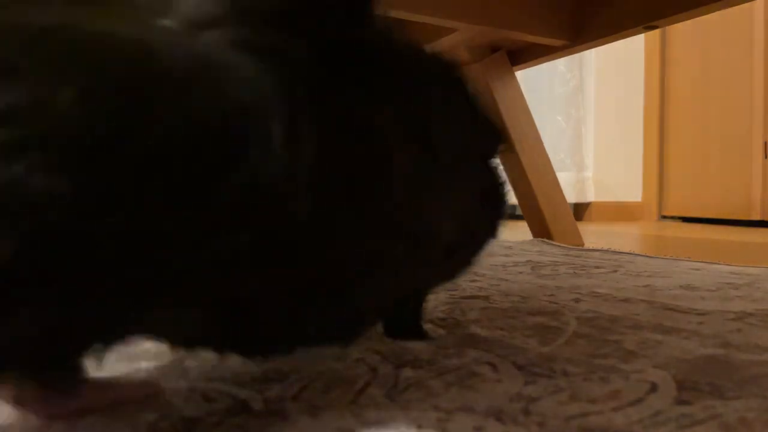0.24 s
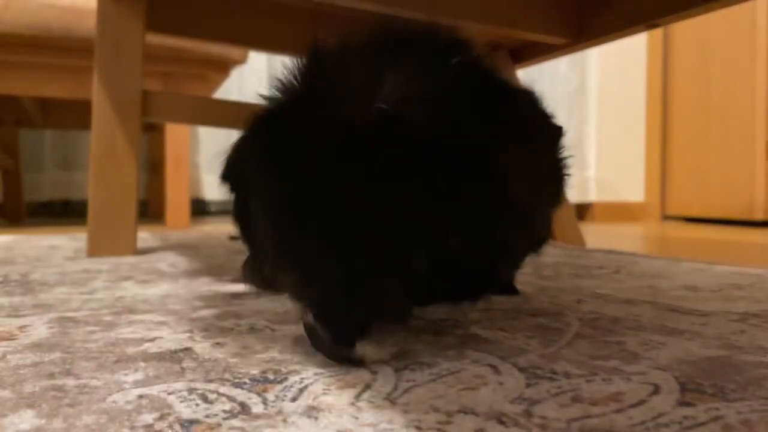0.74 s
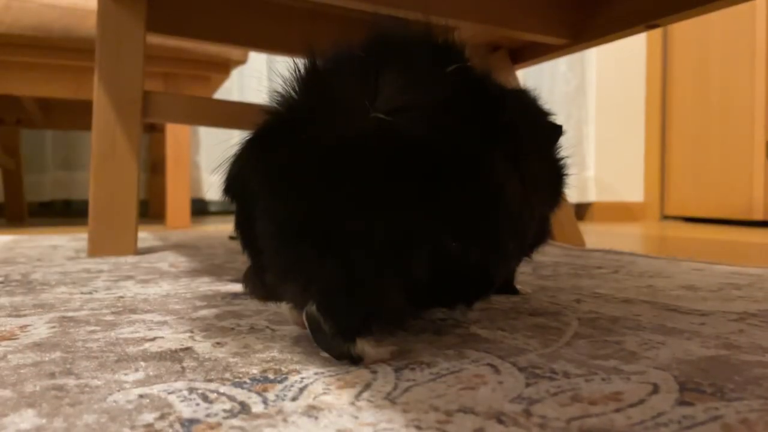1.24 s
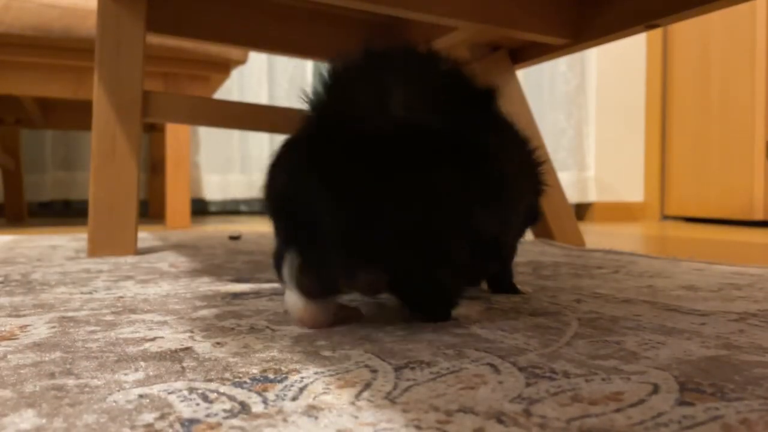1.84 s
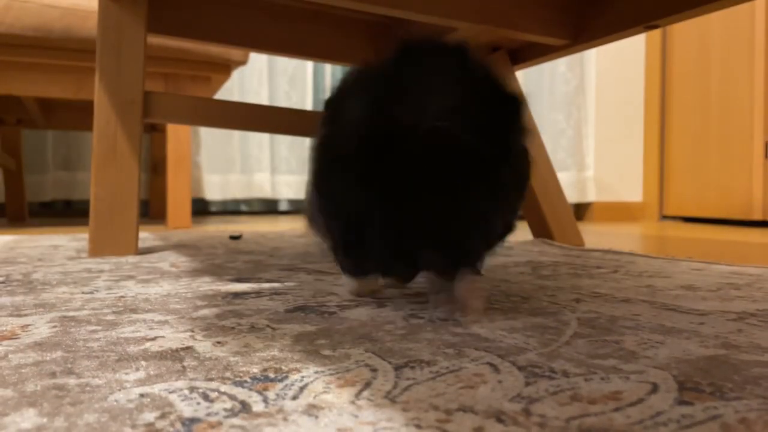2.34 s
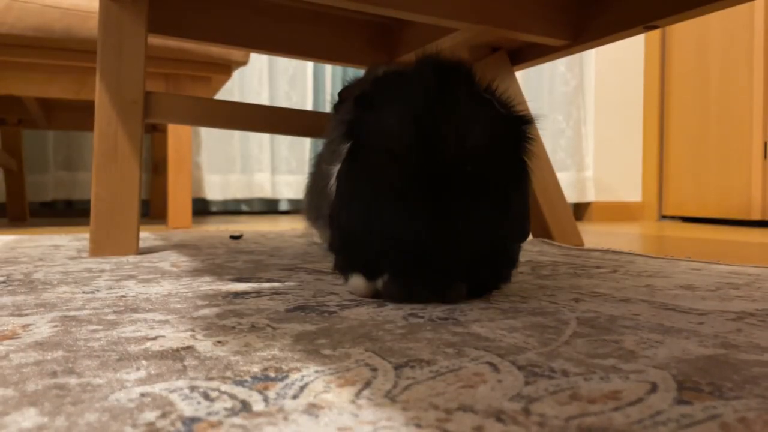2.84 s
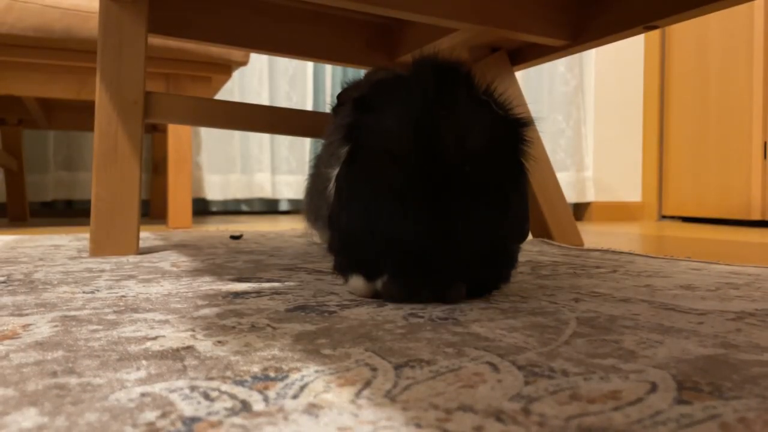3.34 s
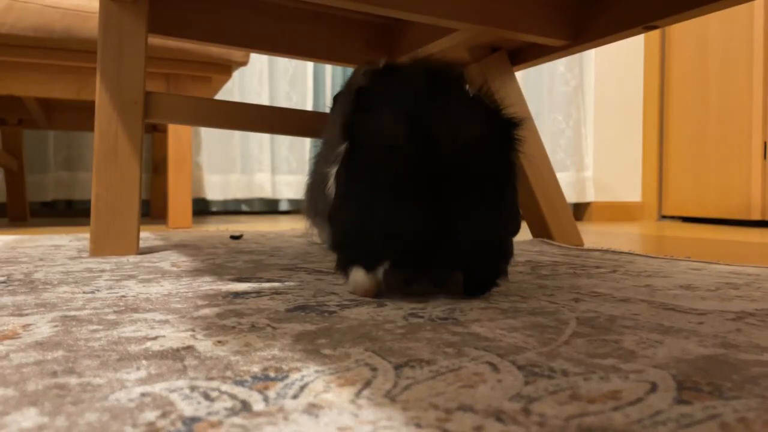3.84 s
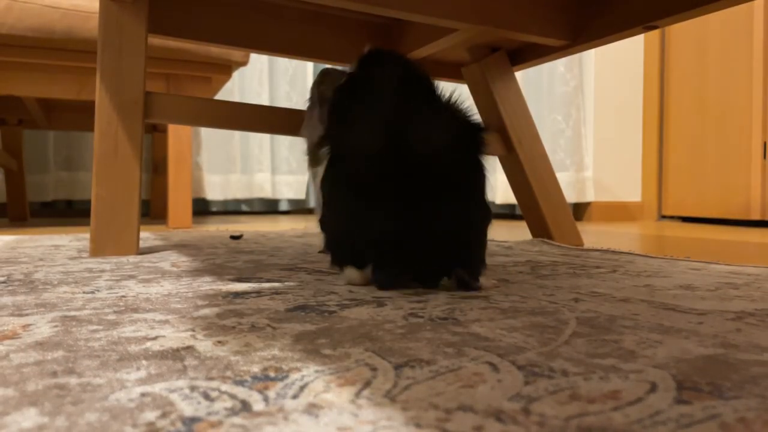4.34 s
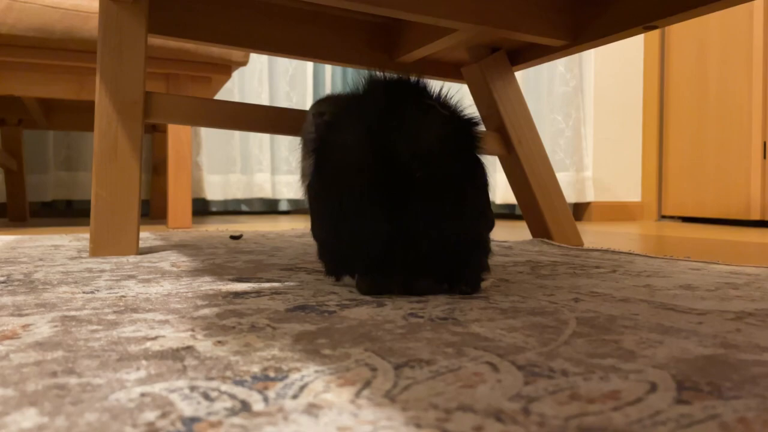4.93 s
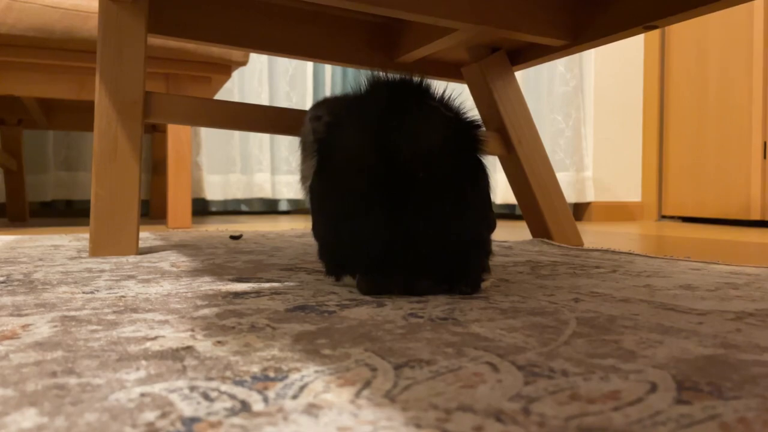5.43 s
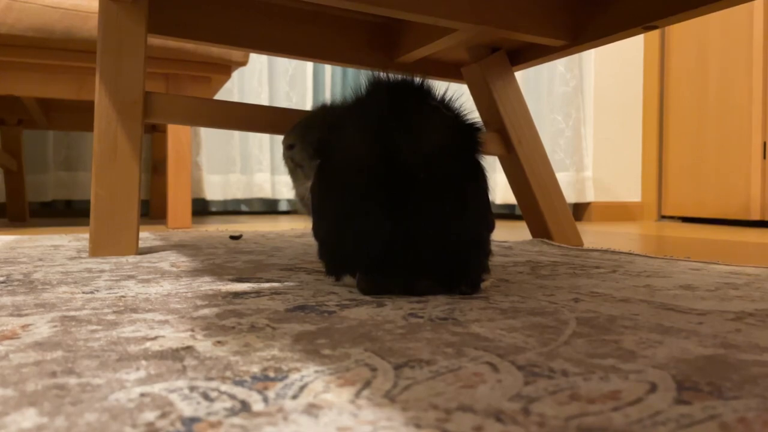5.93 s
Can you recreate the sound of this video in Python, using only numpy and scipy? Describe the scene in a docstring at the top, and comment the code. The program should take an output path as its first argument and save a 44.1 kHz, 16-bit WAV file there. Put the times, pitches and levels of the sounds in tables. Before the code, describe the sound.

Quiet, low-pitched guinea pig chutting, crackly pulses flipping into brief chirps, with faint rug scuffs and soft thumps over a low room rumble.

```python
"""Under a low wooden table in a quiet room, a guinea pig chuts as it walks away over a rug.
Its slack vocal folds creak in bouts of crisp pulses that quicken and flip into short arched chirps.
The voice turns duller as it faces away; claws, fur and a dull knock are swells of grainy noise.
Low thumps ring in the floor, the nose hisses softly, and the house rumbles steadily below."""
import sys
import numpy as np
from scipy import signal
from scipy.fft import rfft, irfft
from scipy.io import wavfile

SR = 44100
rng = np.random.default_rng(int(sys.argv[2]) if len(sys.argv) > 2 else 0)


def unload_audio(sound):
    """Save the sound as a 16-bit wav file, at the path given as the first command line argument."""
    columns = np.transpose(np.atleast_2d(sound))
    # keep every value between -1 and 1, then stretch to whole-number steps
    steps = np.round(np.clip(columns, -1, 1) * 32767)
    wavfile.write(sys.argv[1], SR, steps.astype(np.int16))


N = 272582  # samples in the scene

# Tonal chirps. Each row: start in seconds, length in seconds, top pitch in Hz,
# place of the top within the chirp from 0 to 1, relative level in dB.
CHIRP_CALLS = [(0.107, 0.026, 874, 0.75, -43), (0.142, 0.019, 404.4, 0.37, -39.5),
               (0.162, 0.026, 645, 0.28, -38), (0.181, 0.022, 774, 0.89, -43),
               (0.313, 0.02, 460, 0.3, -39.5), (.339, 0.015, 615, 0, -36), (0.384, 0.014, 1125, 1, -44),
               (0.456, 0.02527, 749, 0.65, -42), (0.543, 0.016, 390, 0.2, -40.5),
               (0.562, 0.022, 576, 0.4, -40.5), (.653, 0.025, 1063, 0.96, -44),
               (0.679, 0.017, 878, 0, -40.5), (0.748, 0.026, 950, 0.59, -42.5),
               (.954, 0.015, 780, 0.6, -42), (1.052, 0.02006, 814, 0.07, -43.5),
               (1.144, 0.02, 840, 0.38, -40.5), (1.245, .012, 770, 0.13, -45),
               (1.46, 0.017, 878, 0.18, -44.5), (1.507, 0.038, 525, 0.78, -43.5),
               (1.665, 0.042, 988, 0.43, -39.5), (2.034, 0.0064, 866, 0.9, -41.5),
               (2.355, 0.02613, 635, 0.66, -39), (2.854, 0.01794, 590, 0.8, -44.5),
               (2.888, 0.057, 808.4, 0.4, -40), (2.983, 0.044, 778, 0.29, -39),
               (3.053, 0.0182, 573, 0.37, -42.5), (3.298, 0.045, 797.2, 0.25, -38.5),
               (3.406, 0.026, 661, 0.47, -39.5), (3.628, 0.021, 568, 0.63, -42),
               (3.853, 0.028, 436, 0.81, -38.5), (3.873, 0.019, 732, 0.52, -34),
               (3.914, 0.047, 424.4, 0.55, -37), (4.252, 0.017, 647, 0.3, -40),
               (4.539, 0.034, 589.4, 0.17, -43), (4.582, 0.0414, 413, 0.5, -45),
               (4.843, 0.05, 649, 0.14, -42), (5.025, 0.013, 506, 0.3, -44),
               (5.282, 0.0218, 592, 0.36, -41), (5.36, 0.016, 573.9, 0.72, -42.5),
               (5.507, 0.034, 391.7, 0.28, -39.5), (5.583, 0.024, 796, 0.17, -40.5)]


def amp(db):
    """Decibels to gain."""
    return 10 ** (np.asarray(db) / 20)


def unit(x):
    """Scales to rms 1."""
    return x / np.sqrt(np.mean(x ** 2) + 1e-20)


def read(points, hz):
    """A spectrum joined by straight lines on a log-frequency axis."""
    point_hz, value = np.transpose(points)
    return np.interp(np.log(hz + 1), np.log(point_hz + 1), value)


def add(mix, s, sound):
    """Mixes a sound in at time s, in seconds."""
    start = max(round(s * SR), 0)
    part = mix[..., start:][..., :sound.shape[-1]]
    part += sound[..., :part.shape[-1]]


def wander(like, hz):
    """Random drift through hz normally distributed values a second, joined by straight lines."""
    knots = rng.standard_normal(1024)
    return np.interp(np.arange(len(like)) * hz / SR, np.arange(len(knots)), knots)


def ambience(db=-49.0):
    """Low steady rumble of the house under a faint hiss, as shaped noise more alike in the bass."""
    # Still room. Each row: frequency in Hz, relative density in dB per Hz.
    rumble_colour = [(20, -44.5), (45, -11), (68, 3), (110, -5), (160, 1), (250, -7), (420, -8.5),
                     (650, -14), (950, -18.5), (1300, -34), (2000, -43.5), (6000, -48.5), (12500, -57.5),
                     (14500, -65.5)]
    # Likeness of left and right. Each row: frequency in Hz, correlation from -1 to 1.
    likeness = [(40, 0.87), (130, 0.9), (400, 0)]
    hz = np.fft.rfftfreq(N, 1 / SR)
    left, other = rfft(rng.standard_normal((2, N)))
    same = np.clip(read(likeness, hz), -1, 1)
    right = same * left + np.sqrt(1 - same ** 2) * other
    pair = np.array([left, right])
    return amp(db) * unit(irfft(pair * amp(read(rumble_colour, hz)), N))


def walk(s):
    """Mouth resonance in Hz and the weights of the near, middle and far place at time s."""
    # The walk. Each row: time in seconds, mouth resonance in Hz,
    # place (0 near and side-on, 1 middle and facing away, 2 and above far).
    path = [(0.301, 713, 0), (1.899, 839, 0.14), (2.4, 670, 0.9), (4.25, 663, 1), (4.55, 950, 2.16)]
    times, mouth_hz, place = np.transpose(path)
    place = np.clip(np.interp(s, times, place), 0, 2)
    weights = np.maximum(1 - abs(place - np.array([0, 1, 2])), 0)
    return np.interp(s, times, mouth_hz), weights


def chirp_gap(t):
    """Seconds to the nearest chirp, negative while one holds."""
    return np.min([np.maximum(s - t, t - s - length) for s, length, *_ in CHIRP_CALLS], axis=0)


def throat(drive, s, db, effort_db, mouth_db=7, mouth_width_hz=150, bright_db=1.16, usual_db=-42,
           size=2048):
    """Causal ringing of throat and mouth at level db, shaded by the body as the animal turns."""
    # Voice side-on and close. Each row: frequency in Hz, relative level in dB.
    near_colour = [(40, -36.5), (220, -2), (450, -11.5), (1000, -7), (1900, -24), (2700, -42), (5000, -52)]
    # Voice facing away. Each row: frequency in Hz before the far shift, relative level in dB.
    away_colour = [(40, -32), (255, 2.5), (530, -8), (1270, -5.5), (1580, -25.5), (1980, -32.5),
                   (2550, -26.5), (3400, -22.5), (3950, -44.5), (6000, -58)]
    far_scale, far_db = .93, -3  # at the far place resonances sit lower and treble is weaker
    hz = abs(np.fft.fftfreq(size, 1 / SR))
    mouth_hz, (near, _, far) = walk(s)
    away_db = read(away_colour, hz / far_scale ** far)
    colour_db = near * read(near_colour, hz) + (1 - near) * away_db
    # Soft calls are rounder.
    treble_share = np.clip(np.log2((hz + 1) / mouth_hz), 0, 1)
    treble_db = (bright_db * (effort_db - usual_db) + far_db * far) * treble_share
    mouth = np.sqrt(1 + amp(mouth_db) ** 2 / (1 + (2 * (hz - mouth_hz) / mouth_width_hz) ** 2))
    log_gain = np.log(mouth * amp(colour_db + treble_db))
    # Minimum phase: the ringing follows each pulse and never precedes it.
    ring = np.fft.ifft(np.exp(np.conj(signal.hilbert(log_gain)))).real[:size // 2]
    sound = signal.fftconvolve(drive, ring)
    return amp(db) * sound / np.sqrt(np.sum(sound ** 2) / len(drive))


def rattle(s, length, db, pulses_per_s, jitter=.13, shimmer_db=1.8, air=.075, puff_s=.002,
           usual_pulses_per_s=110):
    """Slack folds snap open in uneven pulses with puffs of air; fast creaks are breathier."""
    # The creak quickens and swells into and out of each chirp, and yields while one holds.
    flank_pulses_per_s, flank_db, flank_s, hush_db = 99, 3.5, .009, -23.5
    crisp_db = 1.34  # each halving of the pulse rate puts more effort into each pulse
    t = np.arange(0, length, 1 / SR)
    gap = chirp_gap(s + t)
    near = np.exp(-np.maximum(gap, 0) / flank_s)
    rate = (pulses_per_s + flank_pulses_per_s * near) * np.exp(jitter * wander(t, pulses_per_s))
    strength = amp(flank_db * near + hush_db * (gap < 0) + shimmer_db * wander(t, pulses_per_s))
    # One pulse each time the running count passes a whole number.
    count = np.floor(np.cumsum(rate) / SR)
    pulses = np.diff(count, prepend=-1) * strength
    pulses = np.pad(pulses, (0, SR // 200))  # room for the last puff
    puffs = signal.lfilter([air], [1, -np.exp(-1 / (SR * puff_s))], pulses)
    puffs = puffs * (1 + rate.mean() / usual_pulses_per_s)
    breath = puffs * rng.standard_normal(SR)[:len(pulses)]
    effort_db = db + crisp_db * np.log2(usual_pulses_per_s / pulses_per_s)
    return throat(pulses + breath, s, db, effort_db)


def chirp(s, length, top_hz, top_place, db, jitter=.012, shimmer=.16, overtone_db=-7.5, edge=.45,
          rasp=1.1, highest_hz=4800, taut_hz=850):
    """Folds lock into a fast vibration of arched pitch, unsteadier when low; air leaks through."""
    # Pitch falls away on both sides of a rounded top.
    glide_octaves_per_s, arch_round_s = 23.45, 0.0054
    u = np.linspace(0, 1, int(length * SR))
    from_top_s = np.hypot((u - top_place) * length, arch_round_s) - arch_round_s
    hz = top_hz * 2 ** (-glide_octaves_per_s * from_top_s)
    unsteady = 1 + jitter * (taut_hz / top_hz) ** 2 * wander(u, 397)
    turns = np.cumsum(hz * unsteady) / SR
    overtones = range(1, int(highest_hz / hz.mean()) + 1)
    folds = sum(amp(overtone_db * np.log2(k)) * np.cos(2 * np.pi * k * turns) for k in overtones)
    # Air pulses once per vibration.
    air = rasp * np.cos(np.pi * turns) ** 2 * rng.standard_normal(SR)[:len(u)]
    swell = signal.windows.tukey(len(u), edge) * (1 + shimmer * wander(u, 250))
    return throat((folds + air) * swell, s, db, db)


def at_microphones(call, s, size=512):
    """Start and stereo sound of a call at time s; floor-to-table bounces spread each pulse."""
    # Paths under the table to the two microphones. Each row: frequency in Hz,
    # left-right balance in dB at the near, middle and far place, left lead in radians at the same three.
    paths = [(424, 3.5, 1, 1, 1.36, 1.1, 0.9), (605, 0.5, 3, 5, 1.52, 0.73, 2),
             (790, -6.5, 5.7, 6.5, -1.63, 1.9, 1.1), (1020, 0.5, 2.7, 5, 0.58, 0.45, 0.66),
             (1280, 0, 4, -6.5, 0.57, 1.1, -1.74), (3000, 1, 4, 5, 1.6, 1.94, -2.2)]
    bass_hz = 169  # lower sound reaches both microphones alike
    bounce_s, bounce_share = .002, .35
    call, places = np.pad(call, size), walk(s)[1]
    hz = np.fft.rfftfreq(len(call), 1 / SR)
    path_hz, *columns = np.transpose(paths)
    curves = np.array([np.interp(hz, path_hz, c) for c in columns])
    curves = curves * np.clip(hz / bass_hz - 1, 0, 1)
    balance_db, lead = places @ curves.reshape(2, len(places), -1)
    gains = np.array([amp(side * balance_db) * np.exp(1j * side * lead) for side in (.5, -.5)])
    gains = gains / np.sqrt(np.mean(abs(gains) ** 2, axis=0))
    # An all-pass: it smears time and leaves the colour alone.
    delay = np.exp(-2j * np.pi * hz * bounce_s)
    bounces = (delay - bounce_share) / (1 - bounce_share * delay)
    pair = irfft(rfft(call) * bounces * gains, len(call))
    return s - size / SR - bounce_s, pair


def voice(chirp_db=-0.25, rattle_db=0.83):
    """All calls, placed between the two microphones along the walk."""
    # Bouts of creaking. Each row: start in seconds, length in seconds, relative level in dB,
    # base rate in pulses per second.
    bouts = [(0.044, 0.054, -48, 125), (.353, 0.031, -43, 212), (.422, 0.06, -45, 240),
             (.607, 0.16, -46, 235), (.895, 0.048, -49, 194), (.972, 0.3, -51, 74),
             (1.297, .046, -51.5, 72), (1.383, .062, -52, 88), (1.605, 0.1515, -50, 105),
             (1.755, 0.25, -56.5, 32.7), (2.15, 0.13, -49, 126), (2.272, 0.087, -45.5, 182),
             (2.937, 0.11, -46.5, 93), (3.343, 0.13, -45.5, 112), (3.483, 0.16, -51, 54.7),
             (3.801, 0.12, -44, 152), (4.2, 0.034, -51.5, 70), (4.239, 0.024, -43, 280),
             (4.502, 0.034, -51, 80), (4.79, 0.0438, -53.5, 57), (4.897, 0.143, -49, 66),
             (4.938, .04, -45, 215), (5.204, 0.033, -55, 60), (5.251, 0.12, -48, 125),
             (5.54, 0.11, -44, 190)]
    out = np.zeros((2, N))
    for calls, source, db in ((bouts, rattle, rattle_db), (CHIRP_CALLS, chirp, chirp_db)):
        for row in calls:
            add(out, *at_microphones(amp(db) * source(*row), row[0]))
    return out


def stroke(colour, grain_db, roundness, s, db, rise, decay, tilt_db, knee_hz=600, size=24576):
    """Start time and sound of a swell of grainy noise that peaks at time s."""
    t, hz = (np.arange(size) - size // 2) / SR, np.fft.rfftfreq(size, 1 / SR)
    grains = rfft(rng.standard_normal((2, size)) * amp(grain_db * wander(t, 520)))
    swell = np.exp(-np.maximum(-t / rise, t / decay) ** roundness)
    # The tilt changes the colour above the knee only, apart from overall level.
    colour_db = read(colour, hz) + tilt_db * np.log2(np.maximum(hz, knee_hz))
    return s + t[0], amp(db) * swell * unit(irfft(grains * amp(colour_db)))


def scuffs(grain_db=6.5, balance_db=3.0):
    """Scuffs are uneven swells of tiny fibre snaps, a claw a bright tick, a thump's knock dull noise."""
    # Claws and fur on the rug; the steeply tilted last row is the dull knock of a thump.
    # Each row: peak time in seconds, relative level in dB, rise in seconds, decay in seconds,
    # tilt in dB per octave.
    rug_strokes = [(0.364, -48.5, 0.007, 0.0055, -3), (0.621, -46.5, 0.01, 0.0044, -7),
                   (1.754, -61.5, 0.009, 0.0079, -3), (2.255, -48, 0.029, 0.026, -4.5),
                   (2.314, -32, 0.00067, 0.0018, 9), (2.343, -51, 0.046, 0.021, -5.5),
                   (4.014, -38.5, 0.008, 0.0096, -19.5)]
    # Colour before the tilt. Each row: frequency in Hz, relative level in dB.
    stroke_colour = [(40, -34), (500, 2.5), (3100, -2.5), (7500, -7), (12500, -5.5), (15500, -34)]
    out = np.zeros((2, N))
    for row in rug_strokes:
        add(out, *stroke(stroke_colour, grain_db, 0.88, *row))
    return out * amp([[balance_db / 2], [-balance_db / 2]])


def thumps(lowest_hz=55):
    """A soft push rings the floor; a longer contact favours its lowest modes."""
    # Thumps on the floor. Each row: middle of the contact in seconds, peak level in dB,
    # contact time in seconds.
    blows = [(2.365, -34, 0.0088), (2.43, -23.5, 0.0059), (4.0198, -20.5, 0.0015)]
    # Floor resonances. Each row: frequency in Hz, relative level in dB, time to fall 60 dB in seconds.
    floor_modes = [(62.5, -11.5, 0.716), (87, 4.5, 0.17), (122.6, 5, 0.11), (148.3, -7, 0.71)]
    out, t = np.zeros(N), np.arange(SR // 2) / SR
    ring = sum(amp(db - 60 * t / t60) * np.sin(2 * np.pi * hz * t) for hz, db, t60 in floor_modes)
    # Slow motion does not radiate.
    highpass = signal.butter(4, lowest_hz, "high", fs=SR, output="sos")
    ring = signal.sosfilt(highpass, ring)
    for s, db, contact in blows:
        push = np.sin(np.pi * np.minimum(t / contact, 1))
        blow = signal.fftconvolve(ring, push)
        add(out, s - contact / 2, amp(db) * blow / abs(blow).max())
    return out


def sniffs(grain_db=1.0, balance_db=6.0):
    """Air hisses softly through the animal's nose, as rounded swells of noise."""
    # Breaths. Each row: peak time in seconds, relative level in dB, rise in seconds,
    # decay in seconds, tilt in dB per octave.
    breaths = [(3.13, -74, 0.1, 0.13, 1.5), (3.252, -52, 0.038, 0.058, -1)]
    # Colour of the nose. Each row: frequency in Hz, relative level in dB.
    nose_colour = [(900, 12.5), (1800, -9), (4400, -6), (4950, 1.5), (5900, -14), (7300, -13), (13300, -7),
                   (15800, -21)]
    out = np.zeros((2, N))
    for row in breaths:
        add(out, *stroke(nose_colour, grain_db, 5.8, *row))
    return out * amp([[balance_db / 2], [-balance_db / 2]])


def room(x, early_db=-11.5, early_decay=.008, tail_db=-15.5, t60=.3):
    """Quick reflections from the table and its legs, then a weak tail from the room."""
    t = np.arange(SR // 2) / SR
    early, late = rng.standard_normal((2, 2, len(t)))
    reflections = amp(early_db) * unit(early * np.exp(-t / early_decay))
    tail = amp(tail_db) * unit(late * amp(-60 * t / t60))
    echoes = (reflections + tail) / np.sqrt(len(t))
    return x + signal.fftconvolve(x, echoes, axes=1)[:, :N]


def scene():
    """Voice, scuffs and sniffs in the room, over the thumps and the house."""
    return room(voice() + scuffs() + sniffs()) + thumps() + ambience()


def record(dry, edge_hz=15900):
    """The recorder's band limit: a steep low-pass."""
    lowpass = signal.firwin(511, edge_hz, window=("kaiser", 9), fs=SR)
    return signal.oaconvolve(dry, lowpass[None], "same")


dry = scene()
out = record(dry)
unload_audio(out)
```